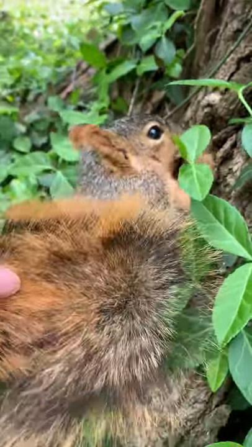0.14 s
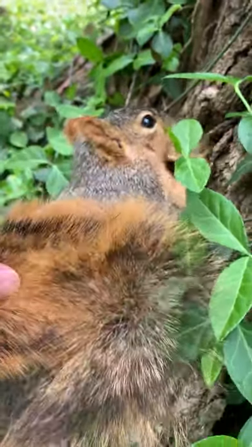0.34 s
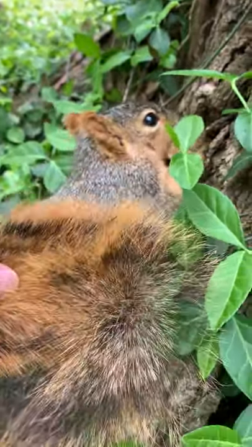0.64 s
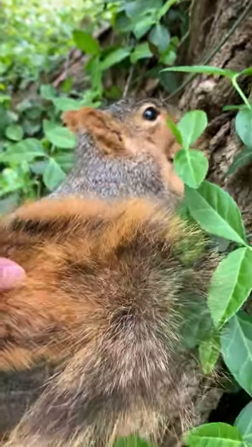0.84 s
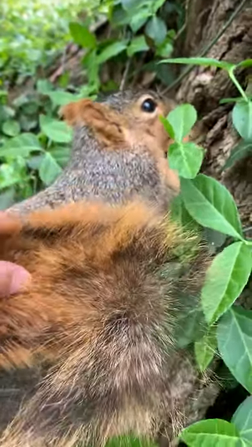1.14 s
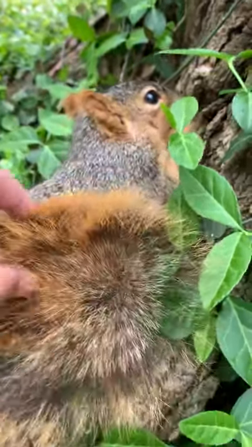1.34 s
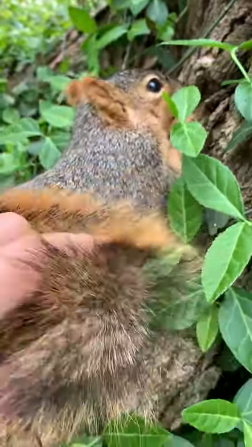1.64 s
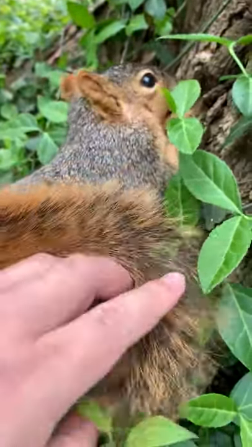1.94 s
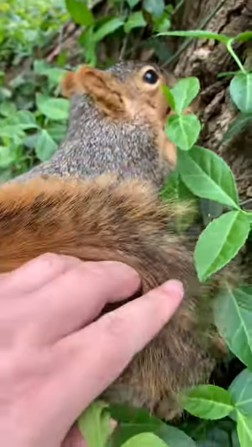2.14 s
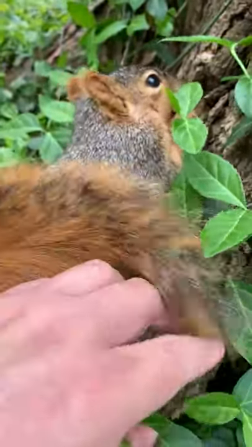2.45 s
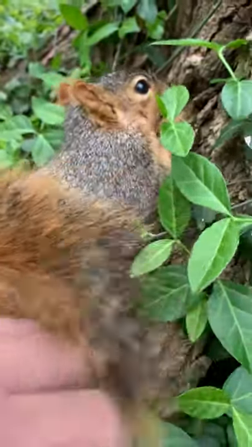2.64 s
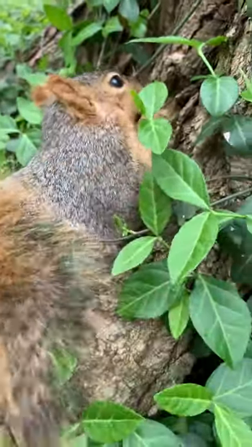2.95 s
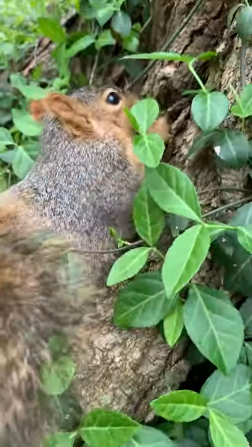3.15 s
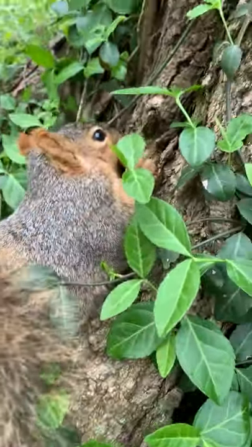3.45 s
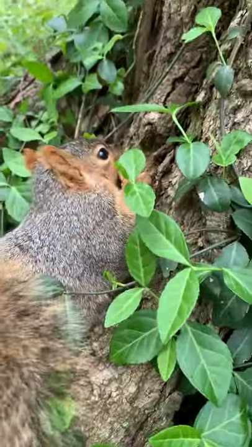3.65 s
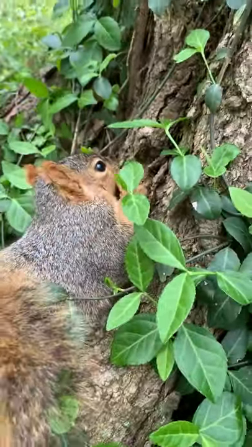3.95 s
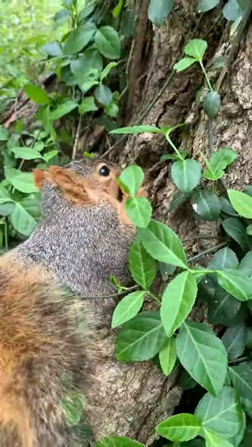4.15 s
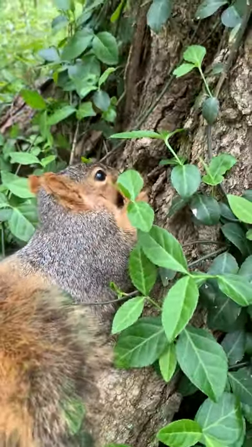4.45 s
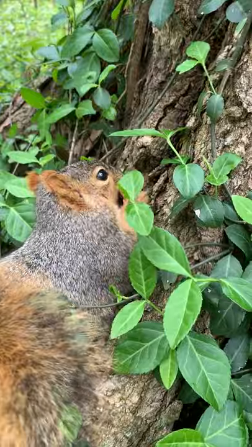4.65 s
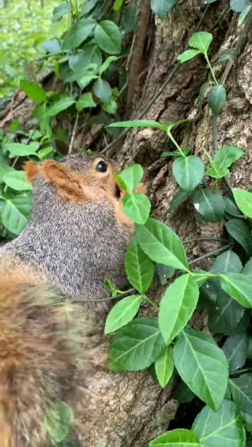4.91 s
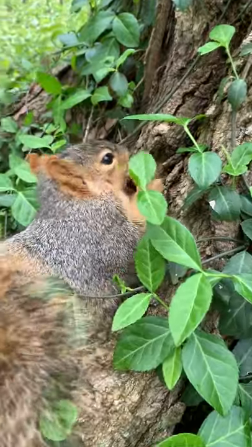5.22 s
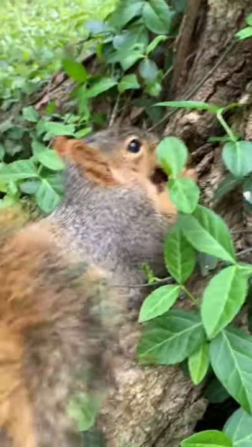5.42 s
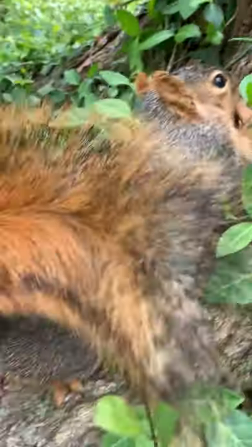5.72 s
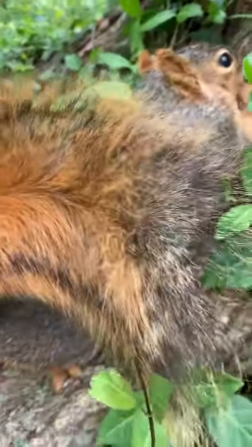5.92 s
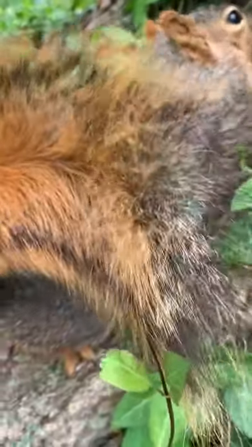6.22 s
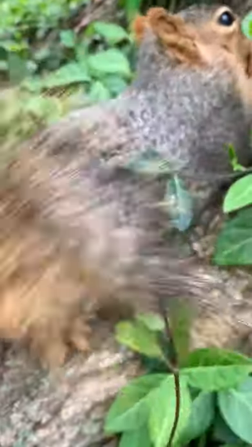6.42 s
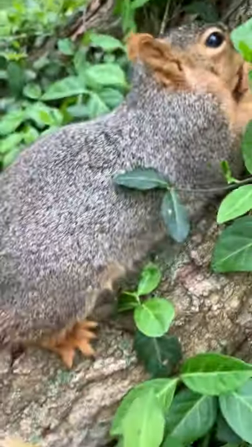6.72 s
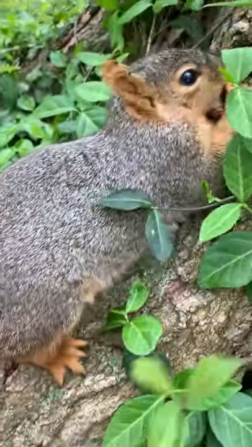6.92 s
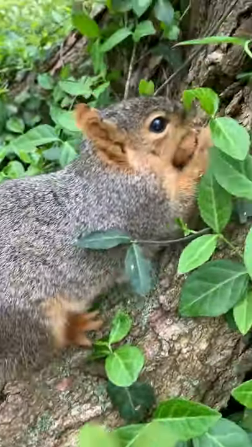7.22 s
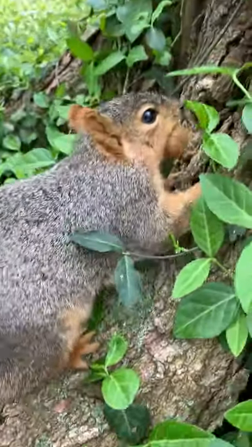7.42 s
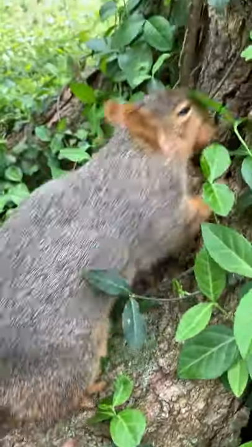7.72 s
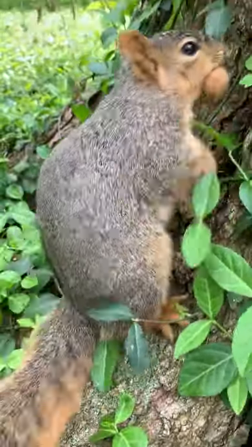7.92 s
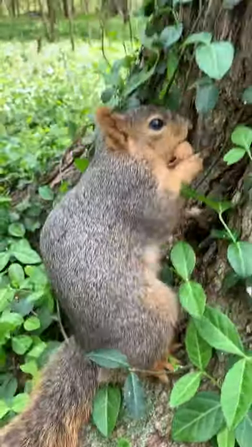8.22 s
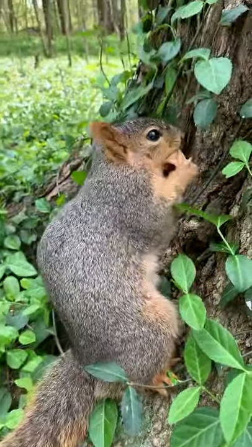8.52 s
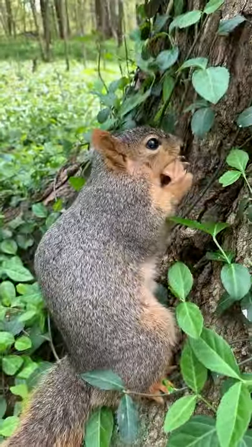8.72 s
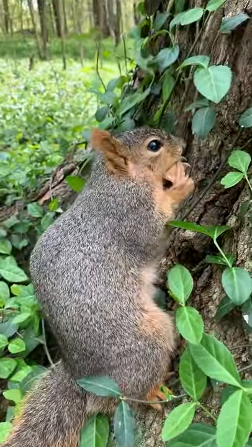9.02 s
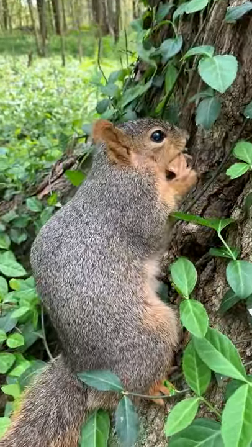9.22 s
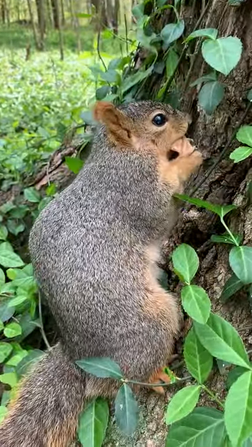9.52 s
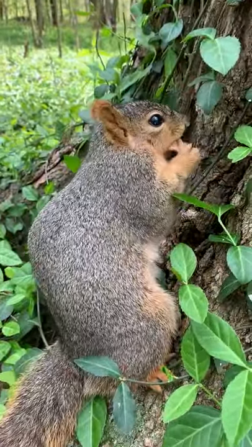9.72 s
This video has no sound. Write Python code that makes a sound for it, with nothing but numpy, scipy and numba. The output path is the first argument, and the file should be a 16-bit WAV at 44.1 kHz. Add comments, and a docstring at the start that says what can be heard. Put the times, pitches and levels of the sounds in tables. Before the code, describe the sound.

Very close outdoors at a tree, a squirrel's teeth tick irregularly on a nut, then crack it sharply several times around two seconds. Quieter nibbling and fur and leaf rustles follow, more loud cracks near five seconds, a stretch of soft brushing and small ticks, and a final tight group of cracks after nine. Faint low traffic and tiny bird whistles lie behind. Handheld phone, nearly dry.

```python
"""Teeth crack and tick on a nut, fur and paws brush leaves and bark, far traffic rumbles, thin birds whistle.
A squirrel gnaws at the foot of a tree, close to a phone. Cracks are noise bursts with rings, knocks a damped
hollow, rustles swelling coloured noise, traffic low noise and bird notes wavering sines with a noise tail.
The phone spreads its stereo by phase and turns its gain down after each loud crack."""
import sys
import numpy as np
from scipy import signal
from scipy.fft import rfft, irfft, next_fast_len
from scipy.io import wavfile
from scipy.ndimage import uniform_filter1d, map_coordinates
from numba import njit

SR = 44100
rng = np.random.default_rng(int(sys.argv[2]) if len(sys.argv) > 2 else 0)


def materialize(psi):
    """Save the field psi as 16-bit PCM at rate SR to the path in sys.argv[1].

    A 1-D psi becomes a single channel; in a 2-D psi each row is a channel.
    """
    bounded = np.clip(np.atleast_2d(psi).T, -1, 1)
    quanta = np.round(bounded * 32767).astype(np.int16)
    wavfile.write(sys.argv[1], SR, quanta)


N = 434826

# tooth contacts: t/s, relative crack energy/dB, knock re crack/dB, top re crack/dB
BITES = [(0.073, -50, 0, -15), (0.116, -40, -10, -15), (0.193, -40, -8, -15), (0.1662, -38, -1, -13),
         (0.248, -39, -18, -16), (0.3257, -26, -9, 2), (0.335, -25, -8, -7), (0.361, -29, -20, -15),
         (0.372, -24, -23, -13), (0.386, -33, -10, -7), (0.4542, -30.5, -9, 2), (0.501, -33.5, -5, -22),
         (0.591, -35, 2.5, -16), (0.642, -39, -2, -15), (0.706, -34.5, -8, -14), (0.762, -29.5, -30, 19),
         (0.81, -49, -15, 17), (0.846, -32, -15, 10), (0.857, -20, -17, -2), (0.8588, -21, -12, 4),
         (0.863, -20, -8, 0), (0.8674, -25, -13, -4), (0.8898, -26, -22, 7), (0.9, -22, -16, -12),
         (0.9017, -27, -2, -10), (0.9095, -35.5, -12, -11), (0.9104, -34.5, 19, -9), (0.954, -31, -24, -21),
         (1.123, -36.5, -7, -8), (1.181, -31, -27, -12), (1.188, -26, -30, -9), (1.232, -28.5, -12, -27),
         (1.235, -44, 8, -10), (1.338, -35.5, 5, -3), (1.3443, -47.5, 15, -5), (1.3854, -30.5, -13, -3),
         (1.477, -50, 16, -8), (1.519, 1.5, -18, -3.5), (1.539, 5, -17, 3), (1.6164, -31, -13, -6),
         (1.6841, 5.5, -14.5, -5.5), (1.781, -29.5, -25, -21), (1.8058, -24, -2, -12), (1.81, -33, 5, -11),
         (1.897, -57, 23.5, -10), (1.9, -61, 15, -13), (1.9557, -33.5, 0, 1), (1.9737, -14, -24, -11),
         (1.9921, 2.5, -24.5, -3), (2.0104, -18, -6, -4), (2.0146, -19, -9, 3), (2.1231, -20.5, -22, -21),
         (2.147, -28, -13, -5), (2.247, -30, -12, -26), (2.2891, -29, -6, -29), (2.3895, 6, -10, -11),
         (2.4109, -41, 18, -15), (2.4675, -16.5, 4.5, 0), (2.5003, -33, -15, -11), (2.547, -31, -3, 6),
         (2.555, -17.5, -23, -7), (2.5635, -21, -24, -15), (2.807, -21.5, -20, -6), (3.019, -20.5, -5, -2),
         (3.029, -39.5, 11, -11), (3.1731, -39.5, 15, -22), (3.1885, -26, -13, -7), (3.196, -26.5, -28, -5),
         (3.327, -34, -7, -13), (3.567, -33.5, -5, -10), (3.648, -32, -8, -7), (3.878, -26.5, -3, -10),
         (3.993, -28, 3.5, -16), (4.0347, -23, 3.5, -13), (4.0386, -13, -9.5, -20),
         (4.2286, -17, -2.5, -14), (4.325, -45, -7, -6), (4.421, -49.5, 14.5, -12), (4.499, -37.5, -9, -15),
         (4.6275, 1, -11.5, -1.5), (4.7165, -32, -7, -15), (4.7472, -18, -8.5, -21),
         (4.876, -32, -5, -13.5), (4.937, 4, -9, -1.5), (4.992, -52.5, 24, -10), (5.1371, -5, -1.5, -13),
         (5.1578, 4.5, -10, -2), (5.732, -34, -8, -12), (6.306, -30.5, -17, -12), (6.317, -33, -8, 0),
         (6.4854, -29, -14, -10), (7.028, -29, -13, 3), (7.0515, -49, 24, 3), (7.1298, -33, -16, 2),
         (7.168, -29, -28, -5), (7.1804, -20.5, -22, -17), (7.226, -32, -4, -7), (7.2458, -36, -5, 8),
         (7.293, -37, -4, -12), (7.3917, -25, -26, -9), (7.403, -23.5, -9, -17), (7.422, -32, -19, -21),
         (7.804, -31.5, -21, -22), (7.8683, -43, -20.5, -13), (7.88, -32, -12, -10), (7.925, -15, -30, -15),
         (7.9512, -29, 5, -7), (7.9725, -17.5, -10, -17), (8.0208, -31.5, -3, -11), (8.057, -33, -6, -17),
         (8.527, -28, -27, -8), (8.54, -29, -20, -14.5), (8.613, -43.5, 13.5, -9), (8.653, -47, 19.5, -9),
         (8.658, -46, 9, -9), (8.718, -40.5, 14, -22), (8.725, -37.5, 18, -19), (8.829, -31.5, -6, -17),
         (8.836, -43, 27, -21), (8.941, -54.5, 17, -24), (9.019, -45, -4, -19), (9.061, -17, -0.5, -10),
         (9.0696, 6, -10, -5.5), (9.1804, -36, -3, -8), (9.186, -51, 25, -7), (9.206, -7, -16, -6),
         (9.2615, -31, -11, -4.5), (9.268, -47.5, 25, -15), (9.2889, 1.5, -12.5, -7), (9.351, -29.5, 4, 13),
         (9.381, 5.5, -11, -6), (9.4882, -32.5, 7.5, -19), (9.5165, -27.5, -32, -17),
         (9.577, -29.5, -11, -23), (9.6488, -34, -5.5, -17), (9.7378, -33, 10, -15),
         (9.741, -27.5, 14.5, -11), (9.7487, -23, 4.5, -8), (9.789, -33.5, 6.5, -25),
         (9.8593, -24.5, 18.5, 0)]


def amp(db):
    """Gain of a level in dB."""
    return 10 ** (np.asarray(db) / 20)


def unit(x):
    """Scaled to rms 1."""
    return x / np.sqrt(np.mean(x ** 2) + 1e-20)


def along(points, hz):
    """Interpolates (f/Hz, value) points on a log frequency axis."""
    f, v = np.transpose(points)
    return np.interp(np.log(hz + 1), np.log(f + 1), v)


def filtered(x, response, size=8192):
    """x times a complex response of frequency; size = samples of padding."""
    m = next_fast_len(x.shape[-1] + size)
    spectrum = rfft(x, m) * response(np.fft.rfftfreq(m, 1 / SR))
    return irfft(spectrum, m)[..., :x.shape[-1]]


def spread(pair, lead, alike, left_db):
    """Left and right from a shared and an unshared sound, then half the phase lead on each side."""
    # treble phase by which left leads right: f/Hz, lead/rad
    lead_treble = [(6400, 4.6), (7800, 6.28), (9200, 6.4), (10000, 8.3), (11300, 9.4), (13700, 12.5),
                   (16500, 12.6)]

    def shares(hz):
        turn = np.arccos(np.clip(along(alike, hz), -1, 1)) / 2
        return np.array([np.cos(turn), np.sin(turn)])

    def sides(hz):
        lead_rad = np.interp(hz, *np.transpose(lead + lead_treble))
        half = np.exp(.5j * lead_rad) * amp(along(left_db, hz) / 2)
        return np.array([half, 1 / half])

    mid, side = filtered(pair, shares)
    return filtered(np.array([mid + side, mid - side]), sides)


def rush(spectrum, patchy_db, grit):
    """Two coloured noises, joint rms 1, with patches of random gain, roughened by the envelope grit."""
    z = signal.stft(rng.standard_normal((2, N)), nperseg=256)[2]
    field = uniform_filter1d(rng.standard_normal(z.shape[1:]), size=3, axis=0)
    field = uniform_filter1d(field, size=16, axis=1)
    pair = signal.istft(z * amp(patchy_db * unit(field)), nperseg=256)[1][:, :N]
    return unit(filtered(pair * grit, lambda hz: amp(along(spectrum, hz))))


def traffic():
    """Far traffic: low-frequency noise with slightly patchy gain."""
    # rumble spectrum: f/Hz, level/dB
    rumble = [(18, -72), (28, -25.5), (40, -7), (60, 4), (90, -0.5), (130, -4), (200, -11.5), (300, -18.5),
              (450, -26), (800, -26.5), (1500, -32), (2500, -52), (5000, -72.5), (16000, -120)]
    return amp(-38.0) * rush(rumble, patchy_db=1.5, grit=1)


def bird():
    """Thin whistled notes, level or slightly slurred, a little unsteady; the trees smear them."""
    # single notes: t/s, length/s, start f/Hz, end f/Hz, relative level/dB
    notes = [(0.657, .07, 8200, 8300, -76), (1.13, .06, 8250, 8150, -78), (2.277, 0.12, 2870, 2850, -67),
             (2.4, 0.082, 2830, 2820, -63), (2.502, 0.073, 2850, 2830, -72),
             (2.59, 0.07, 2855, 2830, -63.5), (2.643, 0.04, 2640, 2640, -64),
             (2.683, 0.13, 2900, 2830, -70), (2.832, 0.076, 2790, 2730, -72),
             (2.9, 0.16, 2830, 2880, -69.5), (2.668, 0.11, 9520, 9560, -89), (3.03, 0.17, 8180, 8140, -76),
             (4.4, 0.093, 8100, 7940, -80.5), (8.947, .035, 7750, 7570, -77),
             (8.983, 0.089, 7650, 8670, -73)]
    waver_hz, flicker_db = 22, 3.5  # rms of the random pitch and level drift
    drift = lambda size: unit(uniform_filter1d(rng.standard_normal(SR // 4), size=size))
    dry = np.zeros(N)
    for start, length, from_hz, to_hz, level_db in notes:
        t = np.arange(int(length * SR)) / SR
        hz = from_hz + (to_hz - from_hz) * t / length + waver_hz * drift(400)[:len(t)]
        level = amp(level_db + flicker_db * drift(500)[:len(t)])
        swell = np.sqrt(np.sin(np.pi * t / length))
        dry[round(start * SR):][:len(t)] += level * swell * np.sin(2 * np.pi * np.cumsum(hz) / SR)
    tail_t60_s = .15
    tail = rng.standard_normal((2, SR // 2)) * amp(-60 * np.arange(SR // 2) / SR / tail_t60_s)
    smear = signal.fftconvolve(dry[None], tail / np.linalg.norm(tail[0]), axes=1)[:, :N]
    return dry * [[1.6], [-.8]] + amp(9) * smear  # rows: shared, unshared


def movement():
    """Strength of the crisp, soft and fine noise: stirring, rustles that swell and fade, crumbs after bites."""
    # steady stirring of fur and leaves: t/s, crisp/dB, soft/dB, fine/dB
    stir = [(0.0, -69.5, -65, -72.5), (0.74, -69.5, -70.5, -77.5), (1.04, -73, -73, -77),
            (1.37, -73.5, -77, -80), (1.98, -74, -65, -76), (2.39, -66, -70, -78),
            (2.69, -72.5, -64.5, -76), (3.32, -69.5, -80, -76.5), (3.51, -64, -62, -71),
            (3.81, -71, -61, -73.5), (4.23, -66, -58, -75.5), (4.94, -63, -61, -70),
            (5.08, -61, -56, -64.5), (5.55, -62, -55.5, -67), (5.68, -68.5, -65.5, -73),
            (5.8, -63.5, -62, -66), (6.31, -71.5, -64.5, -74), (6.56, -61.5, -57, -92),
            (6.86, -70.5, -59, -71), (7.22, -62.5, -73, -66), (7.47, -88.5, -86.5, -81),
            (7.77, -66, -63.5, -76.5), (7.91, -59.5, -65, -78), (8.13, -75, -70.5, -75.5),
            (8.95, -76, -66, -77), (9.09, -76.5, -68.5, -79), (9.25, -64, -60, -77),
            (9.45, -67.5, -79, -90), (9.86, -77.5, -60, -74)]
    # single rustles and scrapes, added in power: peak t/s, length/s, crisp/dB, soft/dB, fine/dB
    rustles = [(0.339, 0.058, -55, -56, -57), (0.444, 0.031, -58, -60, -60),
               (0.591, 0.028, -69.5, -50.5, -72), (.67, 0.093, -84, -81, -84),
               (0.761, 0.054, -56, -62, -49), (0.857, 0.026, -52.5, -44, -39.5),
               (0.898, 0.027, -56, -37, -58), (1.119, 0.07, -63.5, -106, -68), (1.203, 0.23, -71, -75, -69),
               (1.334, 0.039, -77, -63, -70), (1.465, 0.035, -64, -63, -68), (1.577, 0.059, -64, -70, -70),
               (1.618, 0.018, -54, -54, -70), (1.725, 0.041, -65, -77, -70), (1.96, 0.088, -57, -70, -58),
               (2.138, .06, -63, -61, -73), (2.252, .08, -68, -70, -83), (2.469, 0.062, -54, -51, -55),
               (2.565, 0.063, -53.5, -55.5, -54), (2.789, 0.117, -57, -55, -61.5),
               (3.038, 0.126, -53, -55, -66), (3.208, 0.042, -58, -55, -72.5),
               (3.357, 0.66, -60, -61.5, -90), (4.036, .06, -68, -57, -62), (4.608, 0.23, -60, -52.5, -62),
               (4.711, 0.069, -56, -69, -65), (5.869, 0.53, -57, -53, -71), (5.713, 0.072, -60, -86, -67),
               (6.299, 0.13, -55, -62, -57), (6.507, 0.84, -60, -72, -64), (7.025, 0.03, -64, -53, -45),
               (7.172, 0.4, -56.5, -53, -68), (7.388, 0.05, -53, -53.5, -69),
               (7.867, 0.11, -48.5, -53.5, -56.5), (7.9, .03, -47.5, -51, -56),
               (7.996, 0.058, -52, -54, -66), (7.933, 0.115, -48.5, -47, -51),
               (8.523, 0.086, -63, -57.5, -60.5), (8.643, .09, -64, -53, -75),
               (9.197, 0.07, -67, -56.5, -81), (9.352, 0.14, -53, -51.5, -69),
               (9.504, 0.08, -55.5, -59.5, -67), (9.597, 0.084, -63, -55.5, -67),
               (9.738, 0.053, -61, -49.5, -79)]
    rise_share, fade_db = 0.17, 13.5  # share of length spent swelling; ends lie this far under the peak
    crumbs_db, crumbs_t60_s = [-59, -58, -58.5], 0.25  # crisp, soft, fine re crack energy in BITES
    t = np.arange(N) / SR
    s, *levels = np.transpose(stir)
    power = np.array([amp(2 * np.interp(t, s, db)) for db in levels])
    for peak, length, *parts_db in rustles:
        near = slice(max(round((peak - 2 * length) * SR), 0), round((peak + 2 * length) * SR))
        late = (t[near] - peak) / length
        drop_db = fade_db * np.maximum(late / (1 - rise_share), -late / rise_share)
        power[:, near] += amp(2 * (np.c_[parts_db] - drop_db))
    bites = np.zeros(N)
    for start, db, *_ in BITES:
        bites[round(start * SR)] = amp(2 * db)
    crumbs = signal.lfilter([1], [1, -amp(-2 * 60 / (crumbs_t60_s * SR))], bites)
    return np.sqrt(power + amp(2 * np.c_[crumbs_db]) * crumbs)


def brushing():
    """Three grades of fur, leaf and crumb noise swell with movement; tiny snaps, denser in strong moves, roughen them."""
    # noise spectra: f/Hz, level/dB
    crisp_spectrum = [(3000, -42.5), (4200, -6.5), (5200, -8), (6500, -4.5), (8200, -4.5), (9300, -13.5),
                      (10500, -14.5), (12000, -45), (15000, -99.5)]
    soft_spectrum = [(500, -38), (1200, -2), (2500, -2.5), (4000, -6), (5500, -21), (9000, -94)]
    fine_spectrum = [(7500, -40), (9300, -4), (10500, -1), (13000, -1), (15000, -4), (15700, -8),
                     (16000, -60)]
    # colour of the crisp rustle: t/s, upper half over lower half/dB
    crisp_tilt = [(0, -1), (1, 0), (2, -1), (3.1, 2.5), (3.35, -9.5), (3.55, -11), (3.9, -2), (4.6, -5.5),
                  (5.5, -4.5), (6, -1.5), (6.4, 2), (6.8, -8), (7.5, -0.5), (8.3, -1.5), (9.86, 8)]
    split_hz = 7400
    crisp, soft, fine = movement()

    snaps_per_s = 60 + 500 * np.sqrt(crisp / crisp.max())
    snaps = (rng.random(N) < snaps_per_s / SR) * amp(4 * rng.exponential(size=N))
    snaps = signal.lfilter([1], [1, -np.exp(-1 / (0.002 * SR))], np.minimum(snaps, 7))  # 2 ms decay

    # the stroke catches and slips some thirty times a second
    knots = rng.standard_normal(int(N * 30 / SR) + 4)
    catch = map_coordinates(knots, [np.linspace(0, len(knots) - 1, N)])
    crisp, soft, fine = crisp * amp(0.57 * catch), soft * amp(1.3 * catch), fine * amp(1.1 * catch)

    leaves = rush(crisp_spectrum, patchy_db=3.5, grit=1 + 0.33 * snaps)
    upper = filtered(leaves, lambda hz: 1 / (1 + (split_hz / (hz + 1)) ** 16))
    tilt = amp(np.interp(np.arange(N) / SR, *np.transpose(crisp_tilt)) / 2)
    out = crisp * (upper * tilt + (leaves - upper) / tilt)
    out += soft * rush(soft_spectrum, patchy_db=2.4, grit=1 + 0.35 * snaps)
    return out + fine * rush(fine_spectrum, patchy_db=1.5, grit=1 + .6 * snaps)


def teeth():
    """Each contact creaks up to a burst of about a millisecond and crumbles away; it also knocks the hollow shell."""
    # how the nut is held, linear between rows: t/s, shell hollow f/Hz, low ring f/Hz, high ring f/Hz,
    # high over low ring/dB, middle re crack/dB, relative creak and crumble/dB
    grip_table = [(0, 1290, 7300, 8400, -11, -4, 1), (.8, 1340, 6900, 8350, 12, -16.5, -1),
                  (1.4, 1530, 6500, 8450, -44, -28.5, -11), (1.55, 1580, 6340, 8800, -7, -24, -13),
                  (1.68, 1550, 6350, 8350, -4.5, -18.5, -11.5), (2.0, 1730, 5980, 8360, -28, -16, -8.5),
                  (2.301, 1660, 6660, 8600, -5, -16, -6.5), (3.6, 1610, 6830, 7570, 8, -4.5, -10),
                  (4.6, 1720, 5400, 8500, 3, -4, -6), (4.95, 1750, 5600, 7950, -2, -7, -5),
                  (5.13, 1900, 6100, 8140, -3, -0.5, -11), (5.2, 1860, 5330, 8700, 12.5, -17.5, -12),
                  (7.001, 1630, 6540, 7950, 0, -8, -6), (7.4, 1890, 6600, 8200, -4, -5, -3),
                  (8.001, 1790, 6700, 8350, -4.5, -9.5, -5.5), (8.801, 2075, 7000, 8300, 11, -23, -9.5),
                  (9.051, 2730, 7000, 8560, 17, -19.5, -11), (9.3, 2330, 7570, 8940, 21, -23.5, -3.5),
                  (9.86, 2410, 6870, 8700, -42, -16, -3)]
    # part spectra: f/Hz, level/dB
    crack_spectrum = [(3500, -47), (4500, -14), (5200, -3), (6500, -0.5), (8000, -2), (9500, -6),
                      (10800, -2), (12000, -42.5), (15000, -73.5)]
    middle_spectrum = [(2600, -45), (3300, -9), (4400, 1.5), (5200, -29), (8000, -81.5)]
    top_spectrum = [(9800, -40), (11200, -3), (13000, 0), (15500, -1), (16000, -6), (16800, -26)]
    thud_spectrum = [(250, -42.5), (450, -12.5), (800, -16.5), (1200, -9.5), (1800, -27.5), (4000, -75)]
    # stereo: f/Hz, phase by which left leads right/rad; f/Hz, likeness; f/Hz, left over right/dB
    lead_near = [(0, 0), (1400, -.8), (2400, -1.3), (3400, 0), (4300, 2.6), (5000, 3.1)]
    alike_near = [(500, .6), (1200, .95), (2100, .93), (3200, .55), (4500, .98), (16000, .96)]
    left_near_db = [(800, 5), (1300, 0), (2500, -6), (3700, -4), (4600, 0)]
    ring_gain, ring_width_hz = 3, 850
    break_s, tear_t60_s = 0.00066, 0.003  # how long the shell tears, then its fading
    break_step, step_grows = 8.3, 0.018  # first clean step; its growth, dB per dB of bite
    knock_step = 1.7  # the hollow answers mostly to the first step
    crumble_t60_s, ragged_db = 0.023, 4  # fading of the crumble; scatter of its chips
    # creak and crumble as the hollow feels them, re grip_table; dB fewer per dB of knock
    hollow_loose_db, hollow_t60_s, cleaner = 5.5, 0.037, 0.59
    echo_s, echo_db = 0.003, -15.5

    s, db, knock_db, top_db = (c[:, None, None] for c in np.transpose(BITES))
    turned_s, *grip = np.transpose(grip_table)
    shell_hz, low_hz, high_hz, high_db, middle_db, loose_db = (np.interp(s, turned_s, c) for c in grip)
    lead = 600  # samples ahead of the break
    t = (np.arange(2400) - lead) / SR
    chips = amp(ragged_db * rng.standard_normal((len(BITES), 1, len(t) // 24))).repeat(24, axis=2)
    fall = lambda t60: amp(-60 * np.abs(t) / t60)

    def shape(crumble_db, t60):
        creak = fall(0.0006) + amp(crumble_db - 4.0) * fall(0.02)
        tear = amp(-60 * np.maximum(t - break_s, 0) / tear_t60_s)
        crumble = chips * amp(crumble_db) * fall(t60)
        return np.where(t < 0, creak, tear + crumble + amp(-34.5) * fall(0.2))

    noise = rng.standard_normal((len(BITES), 2, len(t)))
    noise[:, :1, lead:lead + 1] = break_step * amp(step_grows * db)
    bursts = shape(loose_db + 1.5, crumble_t60_s) * noise
    blows = shape(loose_db + hollow_loose_db - cleaner * knock_db, hollow_t60_s) * noise
    blows[:, :1, lead] *= knock_step

    def part(response, push=bursts):
        # energy 1 per channel before mixing
        p = filtered(push, response, size=512)
        return p / np.linalg.norm(p, axis=2, keepdims=True)

    def band(spectrum):
        return part(lambda hz: amp(along(spectrum, hz)))

    def mode(hz, at_hz, width_hz):
        damping = 1j * hz * width_hz
        return damping / (at_hz ** 2 - hz ** 2 + damping)

    def hollow(hz):
        return mode(hz, shell_hz, 590) * mode(hz, shell_hz, 4700) / (1 + (hz / 3400) ** 10)

    def ringing(hz):
        rings = mode(hz, low_hz, ring_width_hz) + amp(high_db) * mode(hz, high_hz, ring_width_hz)
        return amp(along(crack_spectrum, hz)) * (1 + ring_gain * rings)

    knock = part(hollow, blows) + amp(-10.5) * band(thud_spectrum)  # the jaw adds a dull thud
    mix = part(ringing) + amp(knock_db) * knock
    mix += amp(middle_db) * band(middle_spectrum) + amp(top_db) * band(top_spectrum)
    out = np.zeros((2, N + SR))
    for start, sound in zip(np.round(s.ravel() * SR).astype(int) - lead, amp(db) * mix):
        out[:, start:start + len(t)] += sound

    # ground and trunk return each crack twice
    echo = lambda hz: amp(echo_db) * np.exp(-2j * np.pi * hz * echo_s)
    out = filtered(out[:, :N], lambda hz: 1 + echo(hz) + echo(hz) ** 2)
    return spread(amp(2.0) * out, lead_near, alike_near, left_near_db)


def scene():
    """The near teeth over everything that arrives diffusely."""
    # stereo: f/Hz, phase by which left leads right/rad; f/Hz, likeness; f/Hz, left over right/dB
    lead_far = [(0, 0), (350, .1), (900, 2.3), (1600, 2.1), (2500, 2.9), (4200, 2.6), (5000, 3.1)]
    alike_far = [(40, 1), (130, 0.99), (300, 0.87), (600, 0.022), (1200, 0.19), (2600, 0.62), (3700, 0.48),
                 (5000, 0.74), (6200, 0.83), (7900, 0.94), (9200, 1), (10200, 0.15), (12600, .55),
                 (13900, 0.99), (16000, 0.59)]
    left_far_db = [(60, -1), (200, -4), (400, -4), (1300, 0), (5000, 0)]
    diffuse = traffic() + bird() + brushing()
    return teeth() + spread(diffuse, lead_far, alike_far, left_far_db)


@njit
def held(need, keep):
    """Jumps up with the need, then lets go by the factor keep each sample."""
    out = need.copy()
    for i in range(1, len(out)):
        out[i] = max(out[i], out[i - 1] * keep)
    return out


def record(dry):
    """Gain control with a quick and a slow recovery, soft clipping, band limit."""
    threshold_db, quick_s, slow_s, react_s, top_hz = -18, 0.084, .5, 0.0019, 16800
    over_db = np.maximum(20 * np.log10(np.abs(dry).max(0) + 1e-9) - threshold_db, 0)
    cut_db = 0.15 * held(over_db, np.exp(-1 / (quick_s * SR)))
    cut_db += 0.13 * held(over_db, np.exp(-1 / (slow_s * SR)))
    react = np.exp(-1 / (react_s * SR))  # the gain needs a moment, so the front of a crack passes
    x = dry * amp(-signal.lfilter([1 - react], [1, -react], cut_db))
    clipped = x / (1 + np.abs(x) ** 6) ** (1 / 6)
    return np.clip(filtered(clipped, lambda hz: np.clip((top_hz - hz) / 60, 0, 1)), -1, 1)


dry = scene()
out = record(dry)
materialize(out)
```